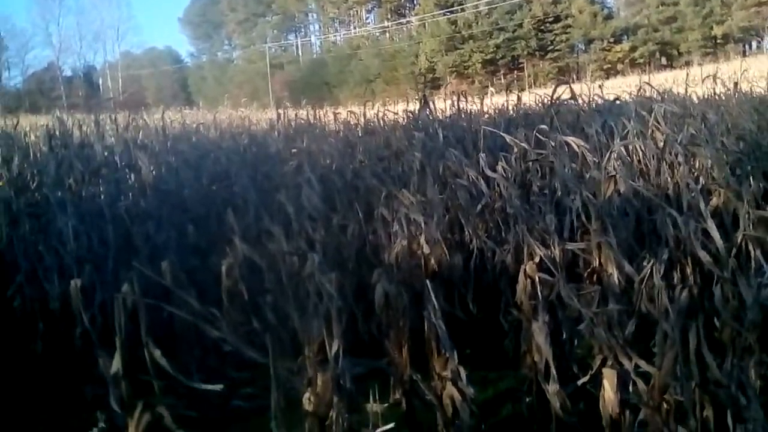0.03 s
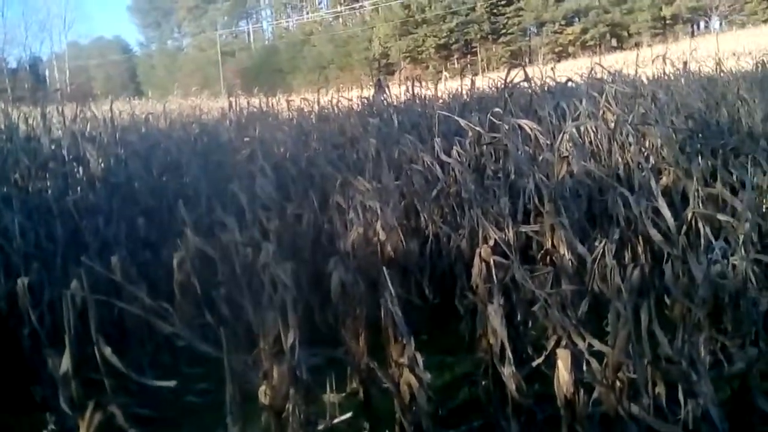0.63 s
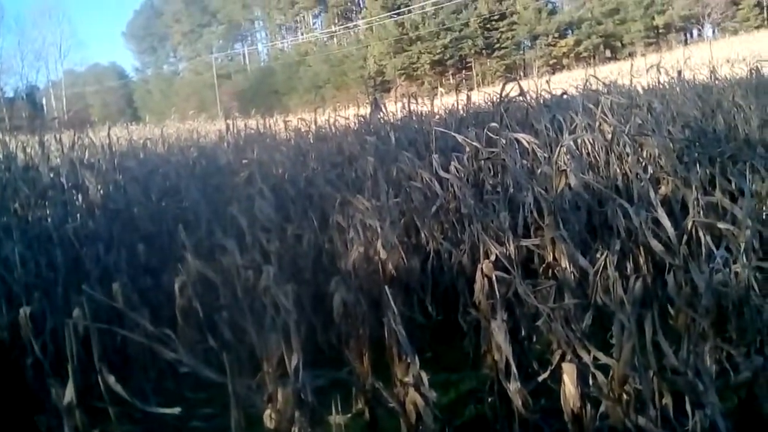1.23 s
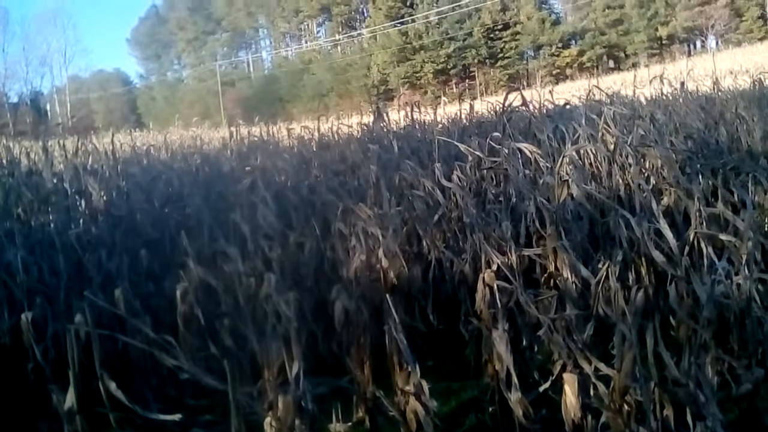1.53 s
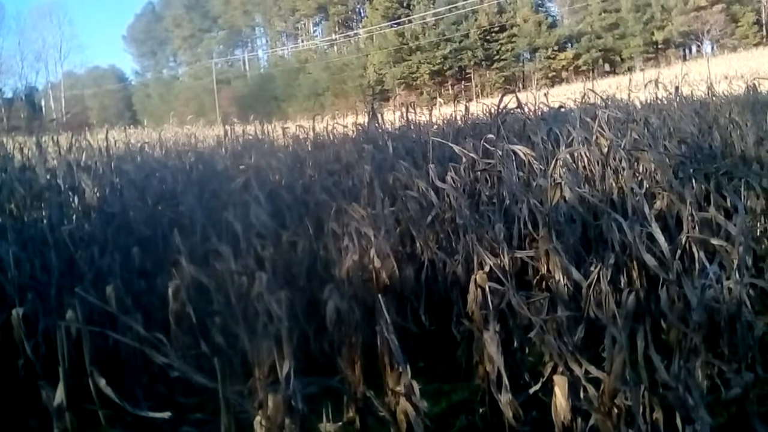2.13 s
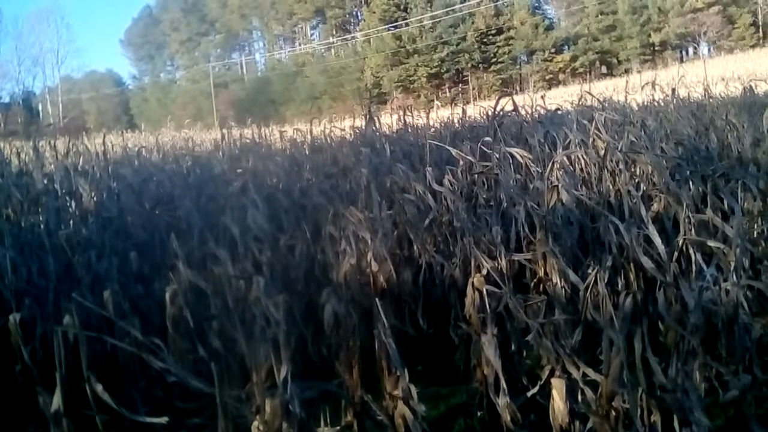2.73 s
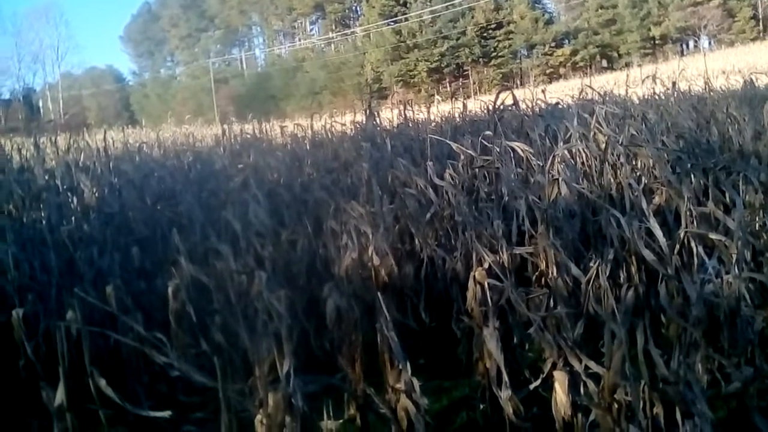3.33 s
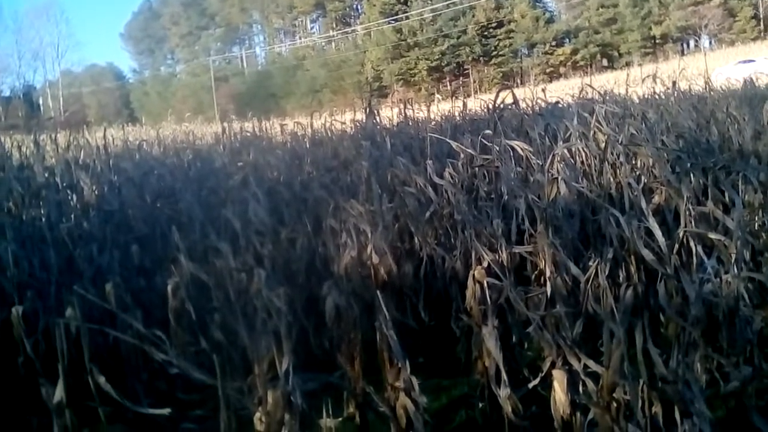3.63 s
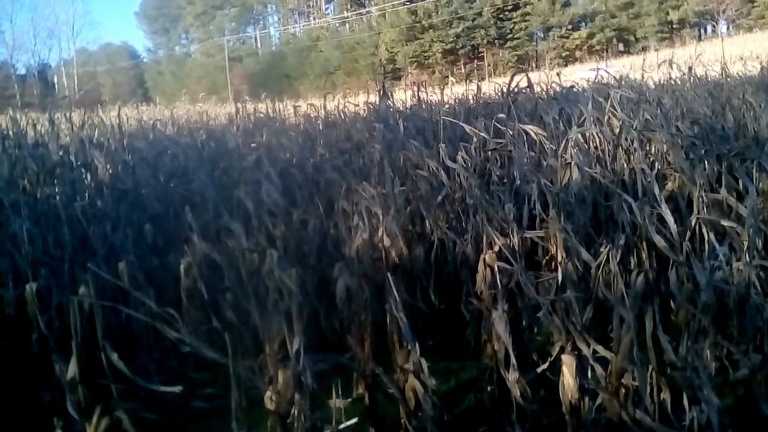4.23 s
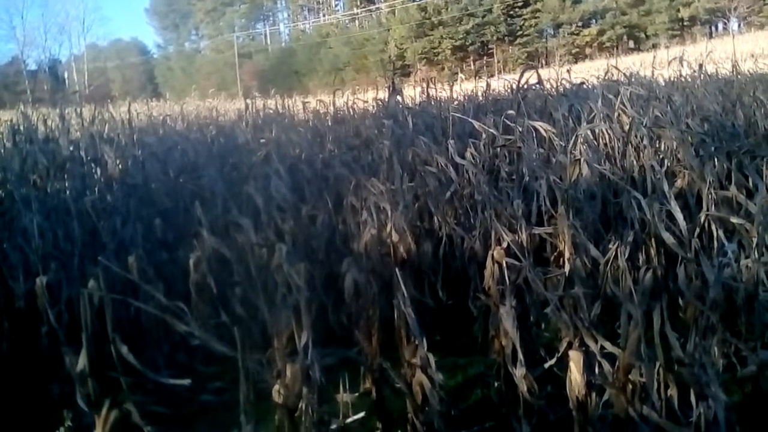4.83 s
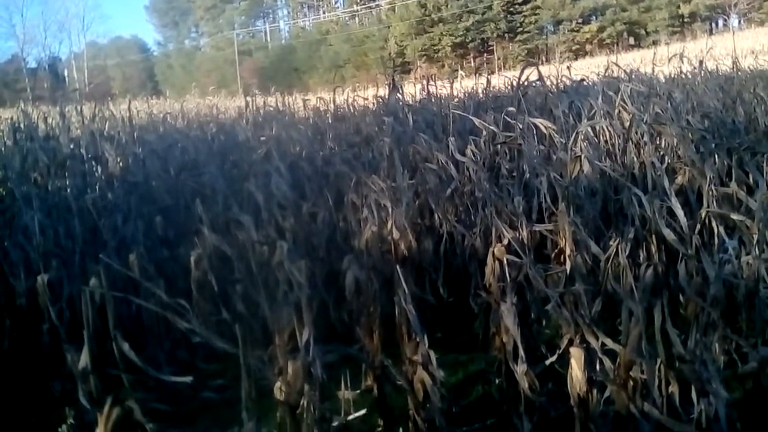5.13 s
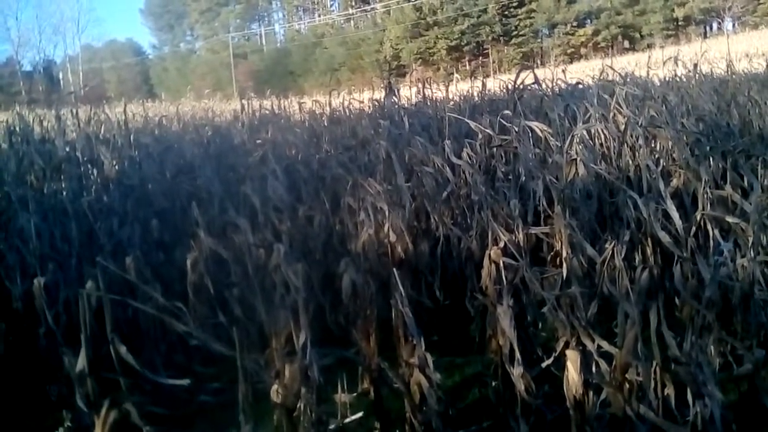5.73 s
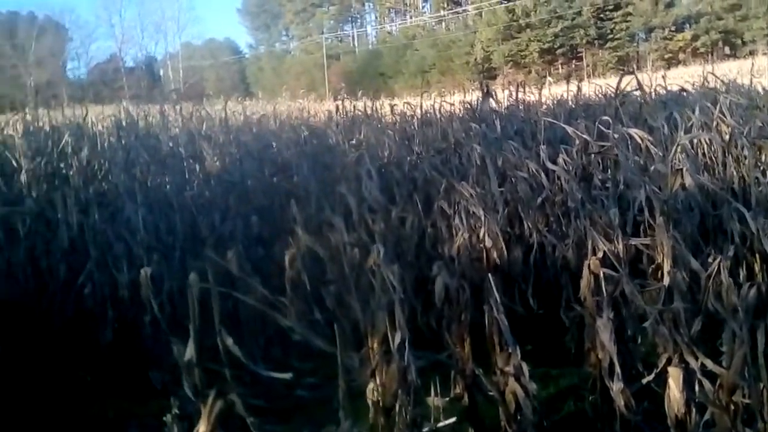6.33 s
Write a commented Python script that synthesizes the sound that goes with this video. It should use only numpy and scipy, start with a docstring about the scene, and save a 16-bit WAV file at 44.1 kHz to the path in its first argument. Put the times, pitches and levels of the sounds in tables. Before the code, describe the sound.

Distant road traffic hums and a car passes beyond a field, then dry corn leaves rustle and snap close by.

```python
"""Traffic first, from a road beyond a dry corn field on a still day: tyre roar, low rumble, engine drone.
The tyres are bands of noise whose colour sinks as a car goes by; the engines sound multiples of their
firing rate. Near the end, at the field's edge, dry leaves close to the microphone are brushed:
they rustle as leaf slides on leaf, and crinkle and snap as they buckle."""
import sys
import numpy as np
from scipy import signal
from scipy.fft import rfft, irfft, next_fast_len
from scipy.io import wavfile

SR = 44100
rng = np.random.default_rng(int(sys.argv[2]) if len(sys.argv) > 2 else 0)


def store_pcm(level_fs):
    """Save levels as 16-bit WAV."""
    pcm = np.round(np.clip(level_fs, -1, 1) * 32767).astype(np.int16)
    wavfile.write(sys.argv[1], SR, np.atleast_2d(pcm).T)


N = 290178
TIME = np.arange(N) / SR


def from_db(db):
    """Decibels to amplitude."""
    return 10 ** (np.asarray(db) / 20)


def unit_power(x):
    """Scale to an RMS of 1."""
    return x / np.sqrt(np.mean(x ** 2) + 1e-20)


def curve(rows):
    """Rows of time and value, joined up at every sample."""
    return np.interp(TIME, *np.transpose(rows))


def drift(rate_hz):
    """Random wander of unit power, mostly slower than rate_hz."""
    step = 8   # samples between draws
    size = next_fast_len(N // step + 2)
    hz = np.arange(size // 2 + 1) * SR / step / size
    slow = irfft(rfft(rng.standard_normal(size)) / (1 + (hz / rate_hz) ** 2), size)
    return np.interp(np.arange(N) / step, np.arange(size), unit_power(slow))


def noise(spectrum):
    """Unit noise of a given colour that falls away beyond the ends."""
    hz = np.maximum(np.arange(N // 2 + 1) * SR / N, 1)
    points_hz, db = np.transpose(spectrum)
    skirts = np.minimum(1, np.minimum(hz / points_hz[0], points_hz[-1] / hz)) ** 4
    colour = from_db(np.interp(np.log(hz), np.log(points_hz), db))
    return unit_power(irfft(rfft(rng.standard_normal(N)) * skirts * colour, N))


def resonate(x, hz, width_hz):
    """Two like two-pole resonances in series, with gain 1 at the peak."""
    r = np.exp(-np.pi * width_hz / SR)
    b = np.array([1, 0, -1]) * (1 - r * r) / 2
    a = [1, -2 * r * np.cos(2 * np.pi * hz / SR), r * r]
    return signal.lfilter(b, a, signal.lfilter(b, a, x + 1e-18) + 1e-18)


def swell(peak_s, db, half_s):
    """Gain of a sound that comes near and goes away."""
    return from_db(db) * np.exp(-.5 * ((TIME - peak_s) / half_s) ** 2)


def gliding_band(hz, width_hz):
    """A unit band of noise around a moving centre."""
    phase = 2 * np.pi * np.cumsum(hz) / SR
    return drift(width_hz) * np.cos(phase) + drift(width_hz) * np.sin(phase)


def passing_bands(rows):
    """Bands of noise that each swell, glide and fade."""
    return sum(swell(peak_s, db, half_s) * gliding_band(hz + glide * (TIME - peak_s), width_hz)
               for peak_s, db, half_s, hz, glide, width_hz in rows)


# Tyre roar as it reaches the field's edge: time_s, level_db
ROAR_LEVEL = [(0, -54), (1.5, -52.5), (2.5, -52.5), (3.4, -56.5), (4.5, -57), (5.9, -54.5), (6.58, -57)]
# Colours of the roar and of the hiss above it: frequency_hz, relative_db
ROAR_SPECTRUM = [(200, 3.5), (270, -7.5), (360, -6), (440, -2), (540, -0.5), (650, -2), (800, 0),
                 (1000, 0.5), (1250, -5.5), (1550, -5), (1850, 0.5), (2250, -6), (2800, -10), (3800, -26)]
TYRE_HISS_SPECTRUM = [(1600, -35), (2500, 0), (3500, -2), (4500, -5), (5500, -7.5), (6500, -8),
                      (7300, -17.5), (8500, -31)]
def tyres(hiss_db=-65):
    """Tyres on the far road: a roar that rises and falls under a nearly steady hiss."""
    roar = from_db(curve(ROAR_LEVEL)) * noise(ROAR_SPECTRUM)
    hiss = from_db(hiss_db + .5 * drift(7.3)) * noise(TYRE_HISS_SPECTRUM)
    return roar + hiss


def passing_car(pass_s=2.05, turn_s=.55, approach_hz=1475, leaving_hz=1010.6):
    """One car goes by beyond the field: a broad peak in its roar sinks from approach to leaving."""
    gone = .5 + .5 * np.tanh((TIME - pass_s) / turn_s)
    centre_hz = approach_hz + (leaving_hz - approach_hz) * gone
    return swell(peak_s=1.51, db=-53.5, half_s=1.4) * gliding_band(centre_hz, width_hz=290)


# Tread whines, then brighter roar: peak_s, level_db, half_length_s, pitch_hz, glide_hz_per_s, width_hz
TREAD_WHINES = [(.3, -59, 0.25, 926, -30, 32), (1.15, -53.5, .26, 910, -29.5, 31.8),
                (1.3, -59, 0.67, 803, -28.5, 50), (2.6, -63, 0.31, 885, -100, 81.3),
                (3.3, -63.5, 0.84, 752.6, 0, 82), (4.75, -60.5, 0.96, 820, 30, 82),
                (6.3, -63, 0.65, 841, 0, 82)]
BRIGHT_ROARS = [(.75, -58, 0.23, 1828, 0, 260), (1.9, -63, 0.16, 2020, -0.5, 260),
                (2.6, -59, 0.29, 1045, -82, 120.1), (3.5, -61.5, 0.68, 1537, -150, 260),
                (5.4, -60.5, 1.6, 1615, 100, 260)]
def tyre_swells():
    """Narrow whines of the tread and wider bands of roar come and go along the road."""
    return passing_bands(TREAD_WHINES) + passing_bands(BRIGHT_ROARS)


# Colour of the road's low end: frequency_hz, relative_db
RUMBLE_SPECTRUM = [(20, -8), (30, -11), (42, -24), (55, -2), (70, -6), (95, 3), (120, 4), (150, 0),
                   (180, -8.5), (215, -8.5), (260, -17.5), (330, -13), (430, -24)]
# Surges in the rumble: peak_s, level_db, half_length_s
RUMBLE_SURGES = [(1.095, -54, 0.26), (2.294, -53, 1.43), (2.793, -51, 0.075), (3.71, -54.5, 0.32)]
def rumble(between_cars_db=-55, waver_db=1.24):
    """A steady rumble carries across the field and swells with the traffic."""
    power = from_db(between_cars_db) ** 2 + sum(swell(*row) ** 2 for row in RUMBLE_SURGES)
    return np.sqrt(power) * from_db(waver_db * drift(3.8)) * noise(RUMBLE_SPECTRUM)


# Engine speed: time_s, firing_hz
FIRING_RATE = [(0, 60.3), (1.1, 59.04), (1.35, 60.9), (3.2, 60.96), (3.9, 62.8), (6.58, 61.2)]
# Base level of the two lowest orders: time_s, level_db
DRONE_LEVEL = [(0, -65), (.4, -49.5), (1.1, -48.5), (1.3, -58.5), (2.3, -74), (3.7, -55.5), (5.4, -58.5),
               (6.58, -60)]
# Exhaust orders: firing_multiple, relative_db
EXHAUST_ORDERS = [(1, -12), (2, -1), (3, -23), (4, -13.5), (5, -20.5), (6, -13.5)]
def engine(wander=0.0129, flutter_db=2.0, rough_rad=0.18, fade_db_per_s=5):
    """Exhaust orders waver in the air; those above the second fade as the car moves off."""
    drone_db = curve(DRONE_LEVEL)
    overtone_db = -48 - fade_db_per_s * TIME
    firing_hz = curve(FIRING_RATE) * (1 + wander * drift(6.06))
    # uneven firing blurs the higher orders most
    phase = 2 * np.pi * np.cumsum(firing_hz) / SR + rough_rad * drift(30)
    drone = 0
    for order, order_db in EXHAUST_ORDERS:
        level_db = (overtone_db if order > 2 else drone_db) + order_db + flutter_db * drift(19)
        drone = drone + from_db(level_db) * np.sin(order * phase + rng.uniform(0, 2 * np.pi))
    return np.sqrt(2) * drone


def far_hum(pitch_hz=256, level_db=-72):
    """A faint tone in the distance, wavering slightly."""
    amplitude = np.sqrt(2) * from_db(level_db + 2 * drift(7.6))
    return amplitude * np.sin(2 * np.pi * np.cumsum(pitch_hz + drift(3.2)) / SR)


# Engines farther off: peak_s, level_db, half_length_s, pitch_hz, glide_hz_per_s, width_hz
FAR_ENGINE_NOTES = [(.6, -62, 0.42, 201.8, -9, 3.5), (1.65, -56, 0.34, 189.1, -6, 2.2),
                    (5.5, -64.5, 0.53, 178.2, 0.5, 6.7)]
def far_engines():
    """Fainter engine notes swell and fade as narrow bands of noise."""
    return passing_bands(FAR_ENGINE_NOTES)


# Resonances of a dry corn leaf: pitch_hz, width_hz, gain_db
LEAF_MODES = [(1024, 710, -6.5), (2030, 650, -1), (3000, 910, -2.5), (3800, 850, -2.5), (4230, 1200, -3.5),
              (5320, 1600, -6.5), (6520, 490, -9), (7170, 810, -10.5), (8730, 2500, -23),
              (11500, 4100, -32.5)]
def leaf(clicks, body_db=0, edge_db=0):
    """Clicks ring the leaf; a thick rib favours the low resonances, a thin edge the high ones."""
    out = 0
    for k, (hz, width_hz, db) in enumerate(LEAF_MODES):
        colour_db = np.interp(hz, [1210, 2550, 4570, 6600], [body_db, 0, 0, edge_db])
        out = out + (-1) ** k * from_db(db + colour_db) * resonate(clicks, hz, width_hz)
    return out


# Brushes through the leaves beside the microphone: peak_s, level_db, rise_s, fall_s
LEAF_BRUSHES = [(2.7, -62, .1, 0.087), (3.2, -64, 0.22, 0.23), (3.44, -63, 0.044, 0.11),
                (5.03, -64, .03, .04), (5.31, -54.5, 0.065, 0.042), (5.44, -58, 0.084, 0.19),
                (5.7, -48.5, 0.18, 0.23), (5.89, -44.5, 0.027, 0.018), (5.96, -50.5, .025, 0.24),
                (6.24, -51.5, 0.33, 0.22), (6.54, -53, 0.081, 0.14)]
def brushing_db(rest_db=-77.5):
    """How hard the leaves rub: each brush builds up and dies away over a faint stir."""
    power = from_db(rest_db) ** 2
    for peak_s, db, rise_s, fall_s in LEAF_BRUSHES:
        envelope = np.exp(-np.maximum((peak_s - TIME) / rise_s, (TIME - peak_s) / fall_s))
        power = power + (from_db(db) * envelope) ** 2
    return 10 * np.log10(power)


def rustle(slips_per_s=3200, size_db=0.5, clump_db=2.1):
    """Leaf slides on leaf, close up: dense tiny slips in clumps."""
    sizes = from_db(size_db * np.minimum(rng.exponential(1, N), 4)) * rng.choice([-1, 1], N)
    slips = sizes * (rng.random(N) < slips_per_s / SR)
    return from_db(brushing_db() + clump_db * drift(43)) * unit_power(leaf(slips))


def crinkles(per_s=14, over_rustle_db=.5, spread_db=6, low_hz=2350, high_hz=5640,
             body_db=-13, edge_db=-9, decay_s=0.0026):
    """Rows of small snaps at random moments and pitches, as strong as the brushing allows."""
    when, size, pitch = rng.random((int(per_s * N / SR), 3)).T
    starts_s = when * N / SR
    levels_db = np.interp(starts_s, TIME, brushing_db()) + over_rustle_db + spread_db * (2 * size - 1)
    rings_hz = low_hz * (high_hz / low_hz) ** pitch
    return [(s, db, body_db, edge_db, hz, decay_s) for s, db, hz in zip(starts_s, levels_db, rings_hz)]


# Single leaf snaps close to the microphone: start_s, level_db, body_db, edge_db, ring_hz, decay_s
LEAF_SNAPS = [(4.146, -60, -6, -5, 3600, .003), (4.182, -58, -3, -7, 3860, .0018),
              (5.2331, -45, 0, -18, 2740, 0.00092), (5.6575, -45, -11, 0, 3084, .002),
              (5.7015, -45, -10, -8, 2100, 0.0036), (5.732, -44.5, -3, -4, 2420, .005),
              (5.7912, -42, 2, 4, 2520, .0067), (5.8105, -44, 9, 9, 1760, 0.002),
              (5.893, -43, -19, 6, 5840, 0.0067), (5.905, -40.5, 3, -1, 2060, 0.0026),
              (5.9132, -35.5, -3, 7, 4940, 0.00098), (5.9366, -38, -1, 2.5, 2450, 0.0034),
              (5.979, -44, 5, -13, 2860, 0.0036), (6.1474, -36.5, 11, 3.5, 2840, 0.0078),
              (6.2149, -36, -2, 4.5, 3300, .0022), (6.2687, -42, -7, 1.5, 2280, 0.0035),
              (6.2858, -42, -5, 5, 2747, .0023), (6.3384, -45.5, 11, 3, 4430, .0062),
              (6.4647, -44.5, -11, 1, 3880, .0046)]
def snaps(tail_s=0.019, tail_db=-16, ring_db=5, ring_width_hz=520, bite_db=-29, bite_s=0.00066):
    """A leaf buckles in a run of cracks and rings at its own pitch; nearby stalks scatter a short tail."""
    out, t = np.zeros(2 * N), TIME[:SR // 16]
    attack = t < .005   # a snap's level is that of its first 5 ms
    for start_s, db, body_db, edge_db, ring_hz, decay_s in list(LEAF_SNAPS) + crinkles():
        envelope = np.exp(-t / decay_s) + from_db(tail_db) * np.exp(-t / tail_s)
        cracks = rng.standard_normal(len(t)) * envelope
        ring = from_db(ring_db) * resonate(cracks, ring_hz, ring_width_hz)
        bite = from_db(bite_db + edge_db) * cracks * np.exp(-t / bite_s)   # the first break, uncoloured
        snap = leaf(cracks, body_db, edge_db) + ring + bite
        start = round(start_s * SR)
        out[start:start + len(t)] += from_db(db) * snap / snap[attack].std()
    return out[:N]


def scene():
    """One microphone at the field's edge: the road far off, the leaves close by."""
    road = tyres() + passing_car() + tyre_swells() + rumble() + engine() + far_hum() + far_engines()
    return (road + rustle() + snaps())[None]


# The microphone's self-noise: frequency_hz, relative_db
MIC_HISS_SPECTRUM = [(1000, 3), (6000, 6.5), (8000, -2), (10000, -2), (13000, -3.5), (13900, 1),
                     (14300, -2), (14750, 11.5), (15600, 5)]
def record(dry):
    """The microphone adds its own thin hiss; the top is cut steeply."""
    hiss_db, cutoff_hz = -70.0, 15650
    hissy = dry + from_db(hiss_db) * noise(MIC_HISS_SPECTRUM)
    return signal.sosfilt(signal.ellip(12, .1, 70, cutoff_hz, fs=SR, output="sos"), hissy)


dry = scene()
out = record(dry)
store_pcm(out)
```